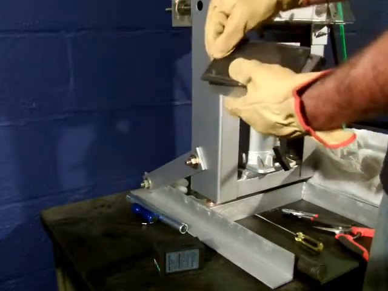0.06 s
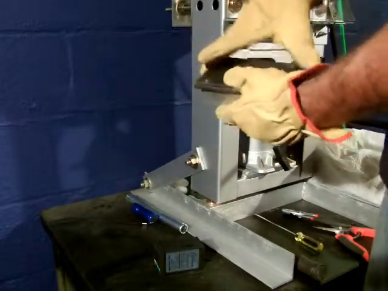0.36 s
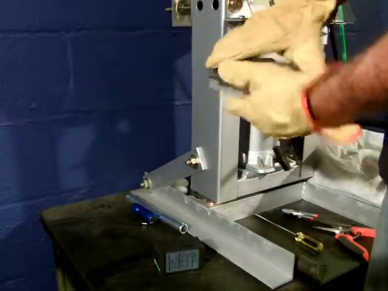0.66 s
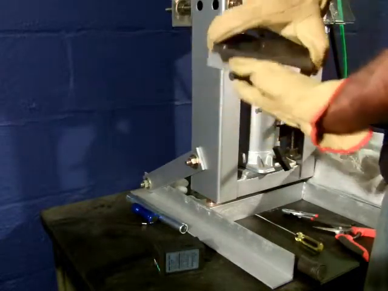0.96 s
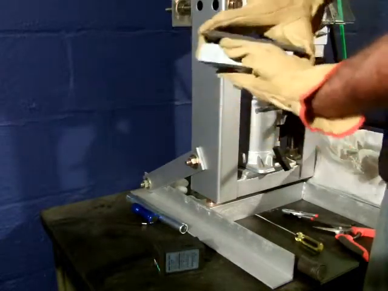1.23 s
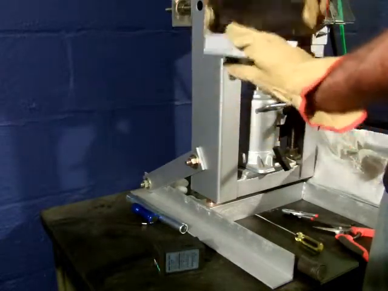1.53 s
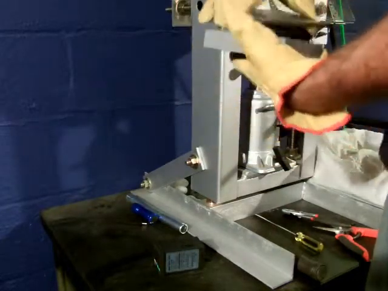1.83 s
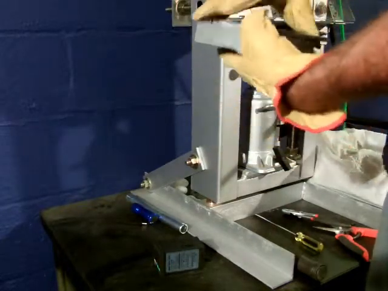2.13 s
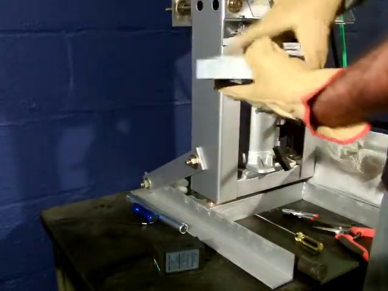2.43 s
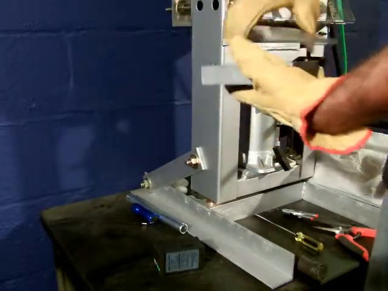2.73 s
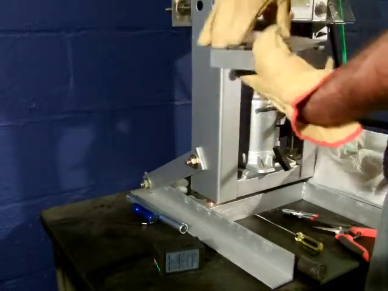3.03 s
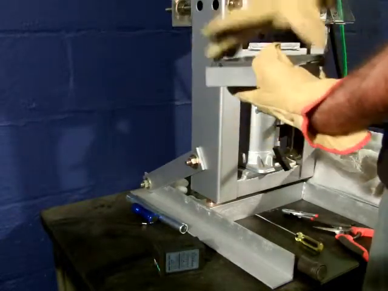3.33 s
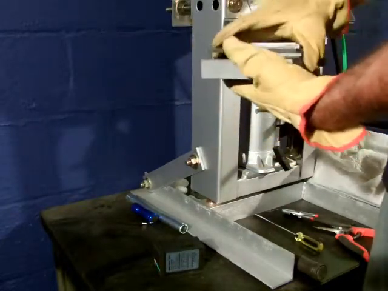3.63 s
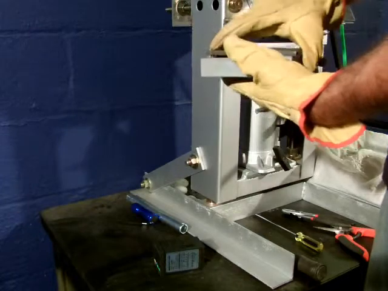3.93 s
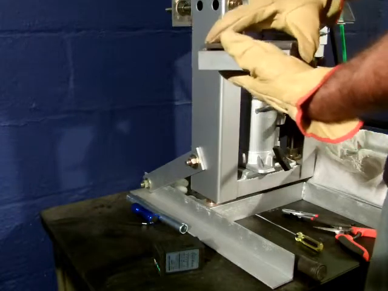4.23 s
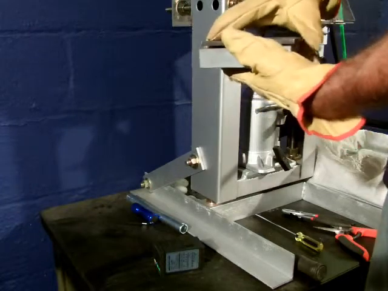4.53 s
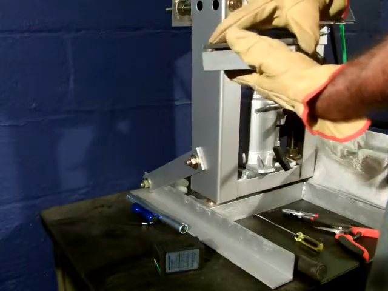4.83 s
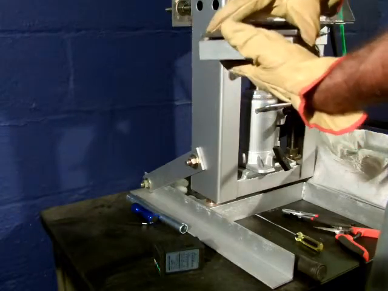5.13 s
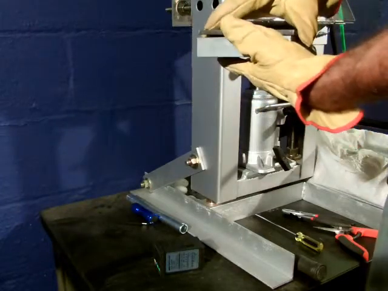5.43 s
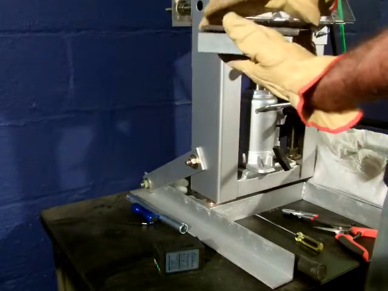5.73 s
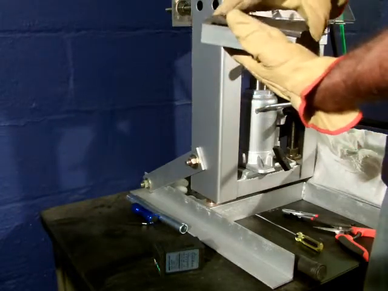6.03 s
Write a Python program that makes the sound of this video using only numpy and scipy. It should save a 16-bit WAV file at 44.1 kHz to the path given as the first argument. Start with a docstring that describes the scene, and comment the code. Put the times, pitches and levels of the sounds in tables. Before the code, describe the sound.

In a small workshop, steel pieces knock and slide against a press frame at uneven intervals. Quiet taps and the brush of leather gloves lead to two sharp, ringing clanks that briefly overload the microphone. Lighter clacks and small clicks follow as the parts settle into place. Each contact has a short room echo, and a fan hums very quietly throughout.

```python
"""Small workshop: gloved hands slide and knock the steel parts of a mold into a benchtop press. Each contact
rings two of four parts (mold block, loose plate, platen, press frame) and leaks into the others; harder contact
is brighter. Leather brushes the metal, the room echoes, a fan hums behind. The loudest clanks overload the
camera and push its gain down for a moment."""
import sys
import numpy as np
from scipy import signal
from scipy.fft import rfft, irfft, next_fast_len
from scipy.io import wavfile

SR = 44100
rng = np.random.default_rng(int(sys.argv[2]) if len(sys.argv) > 2 else 0)


def digitize_waveform(pressure):
    """Quantize a signal to 16-bit integers and store it at the path in sys.argv[1].

    Rows of a 2-D input are taken as channels; values are limited to [-1, 1].
    """
    field = np.atleast_2d(pressure).T
    bounded = np.clip(field, -1, 1)
    quanta = np.round(bounded * 32767).astype(np.int16)
    wavfile.write(sys.argv[1], SR, quanta)


N = 267246

# fan and mains tones: pitch_hz, rms_db, wander_hz
HUM_TONES = [(60.4, -87.5, .1), (113, -92.5, .1), (235, -81.5, 3.5), (468.5, -70, 2.5), (460, -75.5, 5.1),
             (486, -83, 12), (715, -78.5, 3)]
# rush of fan air: freq_hz, density_db
AIR_SPECTRUM = [(15, -67.5), (25, -47), (49, -23.5), (71, -24), (86, -41), (107, -27.5), (204, -26),
                (227, -18), (260, -24), (421, -17.5), (457, -4.5), (567, -15.5), (2770, -17.5),
                (3830, -24.5), (15500, -31.5)]
# room decay: freq_hz, t60_s
ROOM_DECAY = [(150, .35), (800, 0.86), (2000, 0.55), (4000, 0.53), (8000, 0.44), (14000, 0.42)]
# stereo width of diffuse sound: freq_hz, side_db
DIFFUSE_WIDTH = [(60, -10), (150, -10), (500, -12.5), (1200, -12.5), (2500, -11), (5000, -4.5), (9500, -1),
                 (15000, -2.5)]
# leather rubbing metal: freq_hz, density_db
LEATHER_SPECTRUM = [(300, -20), (1500, -5.5), (4000, -13), (8000, -12), (13000, -10), (15500, -24.5)]
# glove strokes: peak_s, half_width_s, level_db
BRUSHES = [(0.826, 0.013, -54), (0.95, 0.053, -63.5), (1.061, 0.043, -58), (1.201, 0.039, -59),
           (1.478, 0.029, -62.5), (5.778, 0.01, -57.5)]
# clear modes of each steel part: pitch_hz, energy_db, t60_s
MOLD_MODES = [(1850, -12, .14), (2134, -2, .28), (2350, -8, .14), (2745, -10, .12), (2900, -11, .11),
              (3368, -1, .22), (3915, -10, .16), (4490, -6, .16), (4585, -7, .22), (5230, -13, .16),
              (5890, -12, .12), (5980, -10, .26), (7176, -7, .15), (7300, -9, .13), (7470, -3.5, .16),
              (7560, -6, .16), (8950, -3.5, .17), (10084, -7, .15), (11225, -6, .17), (11495, -8, .16),
              (11850, -13, .15), (12464, -3, .18), (13280, -8, .18)]
PLATE_MODES = [(1614, -1, .18), (1770, -10, .11), (1808, -9, .17), (2075, -6, .13), (2885, -12, .1),
               (3338, 0, .16), (4535, -6, .16), (7200, -19, .13), (7480, -17, .13), (8910, -18, .16)]
PLATEN_MODES = [(1960, -4, .13), (2030, -7, .13), (2095, 0, .19), (2865, -11, .11), (3380, -8, .15),
                (3885, -4, .15), (3950, -3, .15), (4540, -10, .13), (5955, -9, .18), (7490, -5, .14),
                (10070, -16, .14)]
FRAME_MODES = [(1696, -4.5, 0.12), (1935, 1, 0.18), (2450, -23, .3), (2420, -23.5, .12), (3250, -16.5, .1),
               (3500, -18, .1), (4124, -2, .15), (4670, -4, 0.1), (5400, -5, 0.11), (6030, -1, 0.11),
               (7400, 0.5, 0.095), (7540, -2, .14), (7760, -11, .1), (10090, -2, .17)]
# crowd of weak, quickly damped modes; the last row is a band limit near 14 kHz: freq_hz, density_db
BLOCK_CLACK = [(40, -35.5), (250, -26), (600, -14), (1400, -12.5), (2150, 0.5), (2600, 1), (3300, 1),
               (5000, -2), (6700, -10), (7500, -10.5), (9000, -9), (13400, -18), (14400, -38)]
FRAME_CLACK = [(40, -33), (250, -27), (600, -16.5), (1100, -9.5), (1700, -6.5), (3000, 0), (4700, -3),
               (6800, -11), (7500, -6.5), (9300, -18.5), (11300, -11), (13600, -16.5), (14400, -40)]
# short low-mid click, strongest on clean, heavy blows to the mold: freq_hz, density_db
LOW_MID_CLICK = [(100, -24), (400, -18), (900, 5.5), (2500, 1.5), (6000, -6.5), (15000, -20.5)]
# treble tilt limits of a knock, by part: min_db_per_oct, max_db_per_oct
TILT_LIMITS = {"mold": (-3, 1.5), "plate": (-7, -1.5), "platen": (-6, 1), "frame": (-3, 4.5)}
# steel sliding on steel: peak_s, level_db, main_part, other_part, other_share_db, rise_s, fall_s
SLIDES = [(0.688, -35, "frame", "mold", 0.5, 0.032, 0.0089),
          (2.138, -27.5, "mold", "plate", -8.5, 0.0033, .004),
          (2.158, -7.5, "mold", "frame", -22, 0.0072, 0.0068),
          (2.628, -33, "platen", "mold", -13.5, 0.037, 0.027),
          (3.014, -19, "mold", "platen", -3.5, 0.022, 0.0065),
          (3.067, -25.5, "platen", "plate", 0, .004, 0.0057),
          (3.953, -28.5, "platen", "frame", -15, 0.021, 0.026),
          (4.238, -40, "platen", "frame", -5, 0.024, 0.0046)]
# steel striking steel: start_s, level_db, main_part, other_part, other_share_db, chatter_s
KNOCKS = [(0.1791, -31, "frame", "mold", 1, 0.0029), (0.198, -30, "frame", "platen", -27, 0.0039),
          (1.085, -42.5, "frame", "mold", -3, 0.00039), (1.505, -33, "plate", "frame", -16, 0.00098),
          (1.961, -30.5, "plate", "platen", -2.5, 0.0075), (2.1346, -38, "frame", "mold", -2, .003),
          (2.1426, -9.5, "mold", "frame", -15, 0.002), (2.9769, -19.5, "mold", "plate", -3, 0.0038),
          (3.108, -7, "mold", "platen", -8.5, 0.0041), (3.430, -43, "frame", "platen", -1.5, 0.0023),
          (3.625, -57, "plate", "frame", 3, 0.0058), (3.889, -35, "platen", "plate", -12.5, .003),
          (3.949, -26.5, "platen", "frame", -8, 0.0068), (4.346, -39, "platen", "frame", -7.5, 0.0035),
          (4.3707, -25, "frame", "platen", -0.5, 0.0039), (4.3757, -16, "frame", "platen", -2, 0.0069),
          (4.728, -30, "frame", "plate", -15, 0.0016), (4.749, -23, "frame", "mold", -14.5, 0.001),
          (4.863, -44, "platen", "frame", -8, 0.0068), (5.103, -55.5, "frame", "mold", 1.5, 0.0026),
          (5.128, -42.5, "frame", "mold", -10, 0.0046), (5.298, -49.5, "frame", "platen", -10.5, 0.0044),
          (5.529, -46.5, "frame", "mold", -7.5, .009), (5.585, -56, "frame", "platen", -11, 0.0047),
          (5.995, -38, "frame", "platen", -2, 0.0031)]


def amp(db):
    return 10 ** (np.asarray(db) / 20)


def unit_energy(x):
    return x / np.sqrt(np.sum(x ** 2) + 1e-30)


def lookup(table, freq_hz):
    """Interpolate on a log-frequency axis."""
    table_hz, values = np.transpose(table)
    return np.interp(np.log(freq_hz + 1), np.log(table_hz), values)


def bins_hz(size):
    return np.fft.rfftfreq(size, 1 / SR)


def colour(x, spectrum):
    """Zero-phase filter from a table of freq_hz, gain_db."""
    return irfft(rfft(x) * amp(lookup(spectrum, bins_hz(len(x)))), len(x))


def causal_filter(x, gain_db):
    """Minimum phase, one gain per bin: no ringing ahead of an attack."""
    cepstrum = irfft(np.log(amp(gain_db)), len(x))
    cepstrum[1:len(x) // 2] *= 2
    cepstrum[len(x) // 2 + 1:] = 0
    return irfft(rfft(x) * np.exp(rfft(cepstrum)), len(x))


def noise(spectrum):
    """Coloured noise, rms 1."""
    x = colour(rng.standard_normal(next_fast_len(N)), spectrum)[:N]
    return np.sqrt(N) * unit_energy(x)


def impulses(rate_per_s, size):
    """Random times, random strengths."""
    return rng.standard_normal(size) * (rng.random(size) < rate_per_s / SR)


def add(mix, start_s, sound):
    span = mix[max(round(start_s * SR), 0):][:len(sound)]
    span += sound[:len(span)]


def fan(air_db=-61.5, wander_per_s=25):
    """Wavering blade and mains tones in a steady, diffuse rush of air."""
    t = np.arange(N) / SR
    knots_s = np.arange(0, t[-1] + 1, 1 / wander_per_s)
    mid, side = (amp(air_db) * noise(AIR_SPECTRUM) for _ in range(2))
    for pitch_hz, rms_db, wander_hz in HUM_TONES:
        drift_hz = wander_hz * np.interp(t, knots_s, rng.standard_normal(len(knots_s)))
        mid += np.sqrt(2) * amp(rms_db) * np.sin(2 * np.pi * np.cumsum(pitch_hz + drift_hz) / SR)
    side = colour(side, DIFFUSE_WIDTH)
    return np.array([mid + side, mid - side])


def reflections(early_db=10.5, early_s=0.025, first_s=0.0018, size=32768):
    """Strong early echoes off bench and wall, then a tail that lasts longest in the midrange."""
    taps = np.sign(impulses(rate_per_s=4000, size=size))
    freq_hz, frame_s, spectra = signal.stft(taps, SR, nperseg=256)
    decay = 1000 ** (-frame_s / lookup(ROOM_DECAY, freq_hz)[:, None])
    _, tail = signal.istft(spectra * decay, SR, nperseg=256)
    t = np.arange(len(tail)) / SR
    early_boost = 1 + amp(early_db) * np.exp(-t / early_s)
    return unit_energy(tail * (t > first_s) * early_boost)


def workshop(x, wet_db=-2, side_db=1, direct_db=-2):
    """Direct sound centred; echoes widest in the treble."""
    mid, side = (amp(wet_db) * signal.oaconvolve(x, reflections())[:N] for _ in range(2))
    mid += amp(direct_db) * x
    side = amp(side_db) * colour(side, DIFFUSE_WIDTH)
    return np.array([mid + side, mid - side])


def gloves():
    """Leather brushing metal: soft, high swishes."""
    t = np.arange(N) / SR
    strokes = sum(amp(level_db) * np.exp(-((t - peak_s) / half_width_s) ** 2)
                  for peak_s, half_width_s, level_db in BRUSHES)
    return noise(LEATHER_SPECTRUM) * strokes


def steel_ring(force, tilt_db_per_oct, modes, clack_spectrum, clack_db, clack_t60_s=0.091):
    """One driven part: clear modes over a short, dense clack."""
    knee_hz, pivot_hz, treble_cut_hz = 1400, 4000, 13600
    grip_hz, cluster_hz, cluster_db = 14, 70, 13
    clack_size = 4096

    def tilt_db(freq_hz):
        return tilt_db_per_oct * np.log2(np.maximum(freq_hz, knee_hz) / pivot_hz)

    freq_hz = bins_hz(clack_size)
    tone, cluster_power = 0, 0
    for pitch_hz, energy_db, t60_s in modes:
        radius = 1000 ** (-1 / (t60_s * SR))
        # each grip splits the mode into a slightly different pair
        pair_hz = pitch_hz + grip_hz * np.array([-1, 1]) * rng.uniform(0, 2, 2)
        mode = sum(signal.lfilter([1], [1, -2 * radius * np.cos(angle), radius ** 2], force)
                   for angle in 2 * np.pi * pair_hz / SR)
        tone += amp(energy_db + tilt_db(pitch_hz)) * unit_energy(mode)
        # touching faces widen the mode
        skirt = 1 / (1 + ((freq_hz - pitch_hz) / cluster_hz) ** 2)
        cluster_power += (amp(energy_db + cluster_db) * skirt) ** 2
    band_limit = signal.butter(3, [knee_hz, treble_cut_hz], "band", fs=SR, output="sos")
    tone = signal.sosfilt(band_limit, tone)  # little bass from small parts; treble cut near 14 kHz
    t = np.arange(clack_size) / SR
    burst = rng.standard_normal(clack_size) * 1000 ** (-t / clack_t60_s)
    shape_db = lookup(clack_spectrum, freq_hz) + tilt_db(freq_hz) + 10 * np.log10(1 + cluster_power)
    clack = signal.fftconvolve(force, causal_filter(burst, shape_db))[:len(force)]
    return unit_energy(unit_energy(tone) + amp(clack_db) * unit_energy(clack))


def part_shares_db(main_part, other_part, other_share_db, leak_db=-24):
    """Two touching parts ring; the rest get a weak leak."""
    leaks_db = dict.fromkeys(("mold", "plate", "platen", "frame"), leak_db)
    return {**leaks_db, other_part: other_share_db, main_part: 0}


def contact(force, level_db, shares_db, tilt_db_per_oct, span_s=0.0091):
    """One force rings all four parts; level_db is the main part's energy as rms over span_s."""
    rings = {
        "mold": steel_ring(force, tilt_db_per_oct, MOLD_MODES, BLOCK_CLACK, clack_db=4),
        "plate": steel_ring(force, tilt_db_per_oct, PLATE_MODES, BLOCK_CLACK, clack_db=-3),
        "platen": steel_ring(force, tilt_db_per_oct, PLATEN_MODES, BLOCK_CLACK, clack_db=-3),
        "frame": steel_ring(force, tilt_db_per_oct, FRAME_MODES, FRAME_CLACK,
                            clack_db=9.5, clack_t60_s=0.038),
    }
    mix = sum(amp(shares_db[part]) * ring for part, ring in rings.items())
    return amp(level_db) * np.sqrt(span_s * SR) * mix


def slides(slips_per_s=3000, neutral_db=-28.5, tilt_per_db=0.44, lead_s=0.1, size=18432):
    """Stick-slip grains swell and fade as a part is pushed home; harder is brighter."""
    out = np.zeros(N)
    t = np.arange(size) / SR - lead_s
    for peak_s, level_db, main_part, other_part, other_share_db, rise_s, fall_s in SLIDES:
        push = np.exp(-np.where(t < 0, (t / rise_s) ** 2, t / fall_s))
        force = impulses(slips_per_s, size) * push
        tilt_db_per_oct = tilt_per_db * (level_db - neutral_db)
        shares_db = part_shares_db(main_part, other_part, other_share_db)
        add(out, peak_s - lead_s, contact(force, level_db, shares_db, tilt_db_per_oct))
    return out


def knocks(slips_per_s=2000, neutral_db=-28, tilt_per_db=0.75, click_db=12, size=12288):
    """A sharp blow, then the faces chatter until seated; a clean blow to the mold adds a short low-mid click."""
    equal_energy_s = 0.0061  # chatter this long carries as much energy as the blow
    out = np.zeros(N)
    t = np.arange(size) / SR
    blow = signal.unit_impulse(size)
    click = unit_energy(causal_filter(blow, lookup(LOW_MID_CLICK, bins_hz(size))))
    for start_s, level_db, main_part, other_part, other_share_db, chatter_s in KNOCKS:
        chatter = unit_energy(impulses(slips_per_s, size) * np.exp(-t / chatter_s))
        chatter_energy = chatter_s / equal_energy_s
        force = blow + np.sqrt(chatter_energy) * chatter
        tilt_db_per_oct = np.clip(tilt_per_db * (level_db - neutral_db), *TILT_LIMITS[main_part])
        shares_db = part_shares_db(main_part, other_part, other_share_db)
        add(out, start_s, contact(force, level_db, shares_db, tilt_db_per_oct))
        click_gain = amp(level_db + shares_db["mold"] + click_db) * np.exp(-2 * chatter_energy)
        add(out, start_s, click_gain * click)
    return out


def scene(right_db=0.27):
    """Press work in the room, plus fan; the whole mix leans slightly right."""
    handling = knocks() + slides() + gloves()
    return (workshop(handling) + fan()) * amp([[-right_db], [right_db]])


def record(dry, limit_db=-4, recover_db_per_s=6.0, attack_s=0.0048, ceiling=0.77, lowpass_hz=15500):
    """Limiter: peaks pull the gain down, it creeps back. Overshoot clips; a low-pass follows."""
    peak_db = 20 * np.log10(abs(dry).max(0) + 1e-9)
    over_db = np.maximum(peak_db - limit_db, 0)
    creep_db = np.arange(N) * recover_db_per_s / SR
    held_db = np.maximum.accumulate(over_db + creep_db) - creep_db
    pole = np.exp(-1 / (attack_s * SR))
    reduction_db = signal.lfilter([1 - pole], [1, -pole], held_db)
    clipped = np.clip(dry / amp(reduction_db), -ceiling, ceiling)
    lowpass = signal.firwin(255, lowpass_hz, window=("kaiser", 9), fs=SR)
    return signal.oaconvolve(clipped, lowpass[None], "same")


dry = scene()
out = record(dry)
digitize_waveform(out)
```